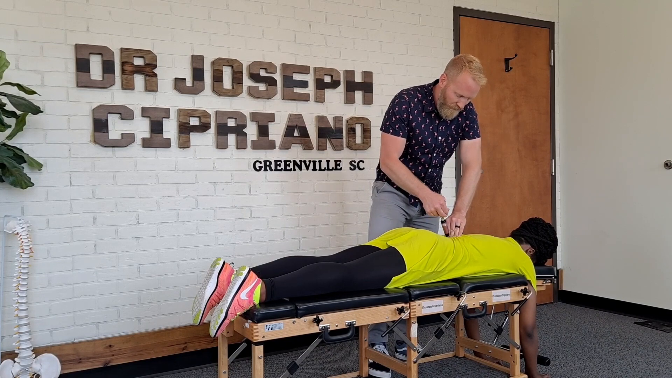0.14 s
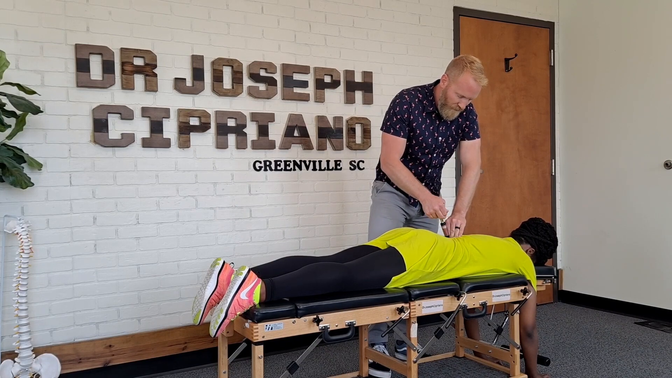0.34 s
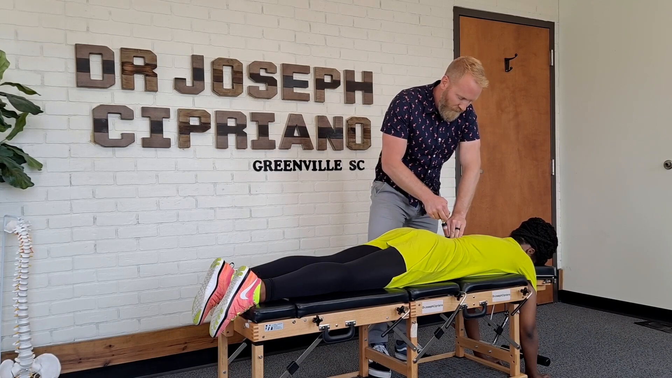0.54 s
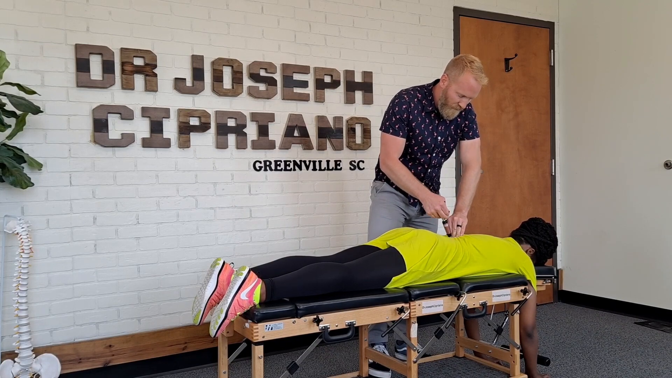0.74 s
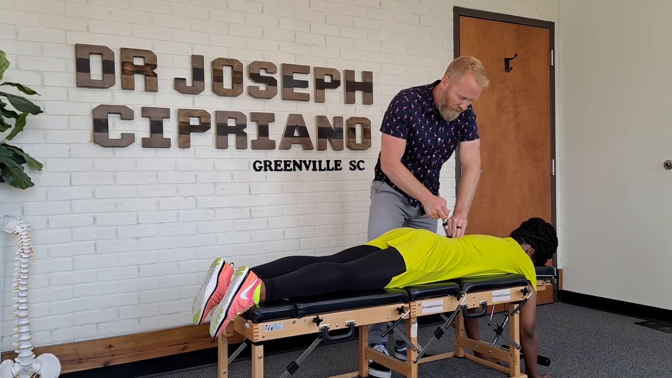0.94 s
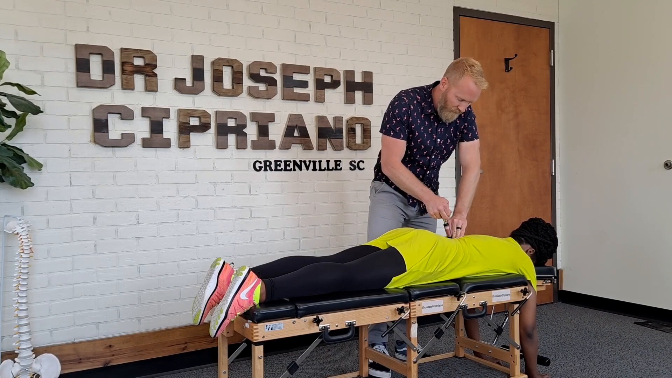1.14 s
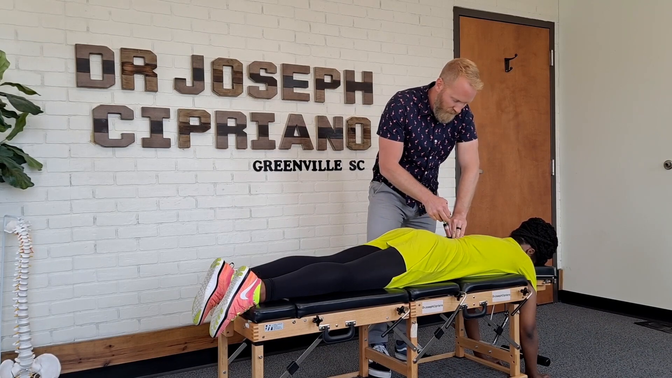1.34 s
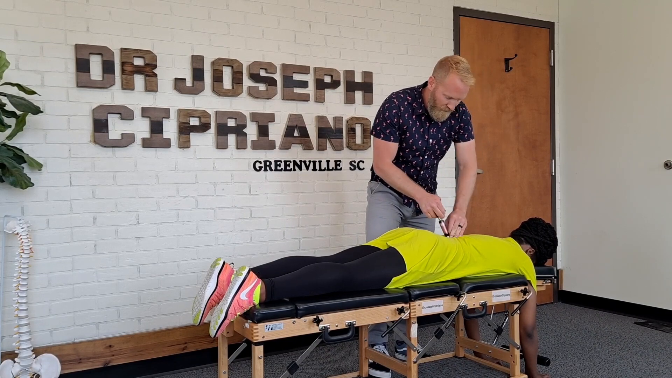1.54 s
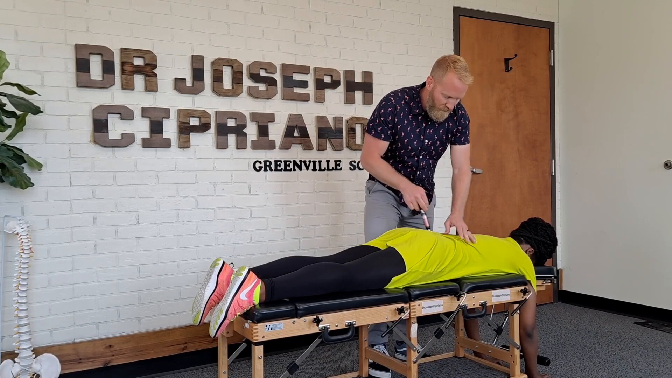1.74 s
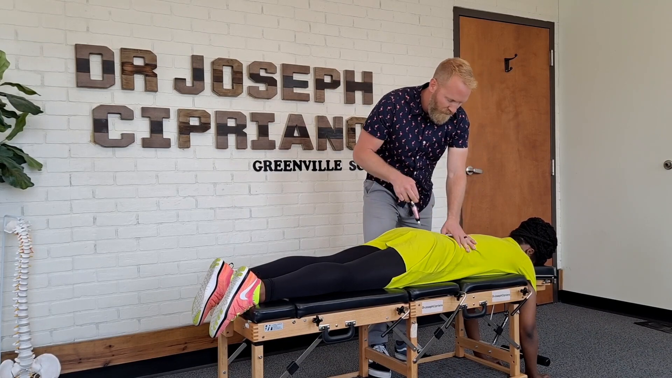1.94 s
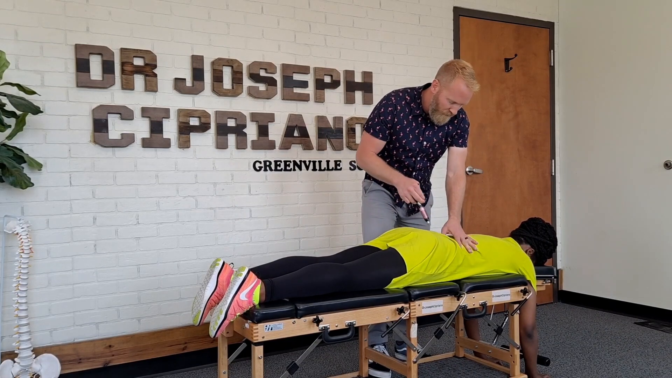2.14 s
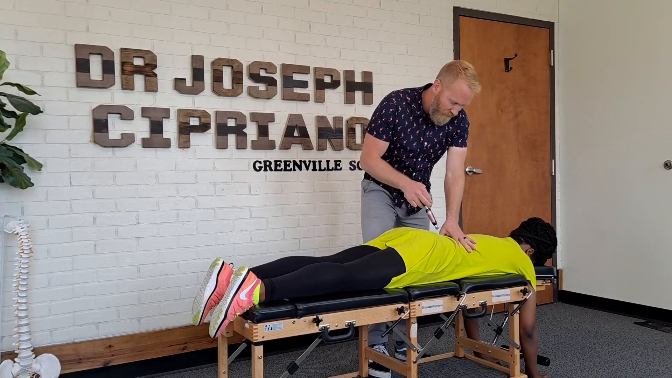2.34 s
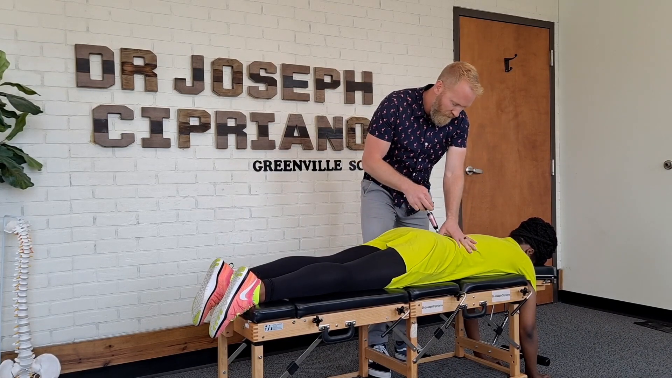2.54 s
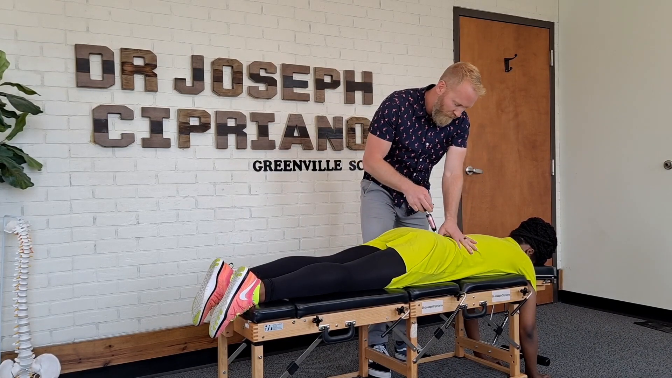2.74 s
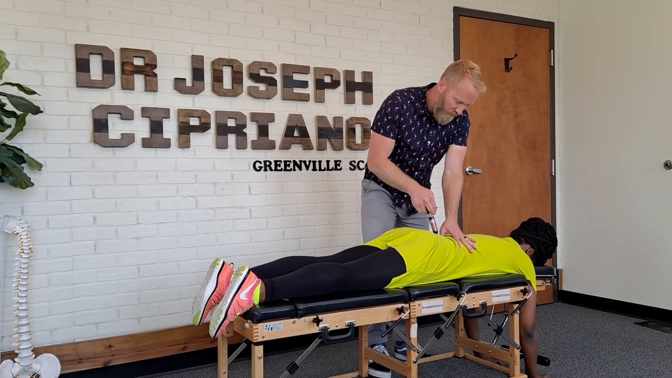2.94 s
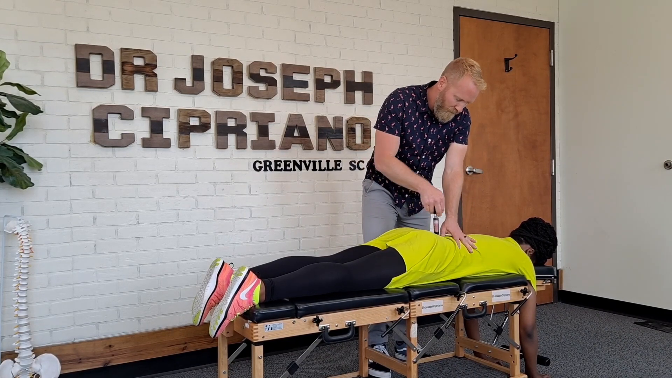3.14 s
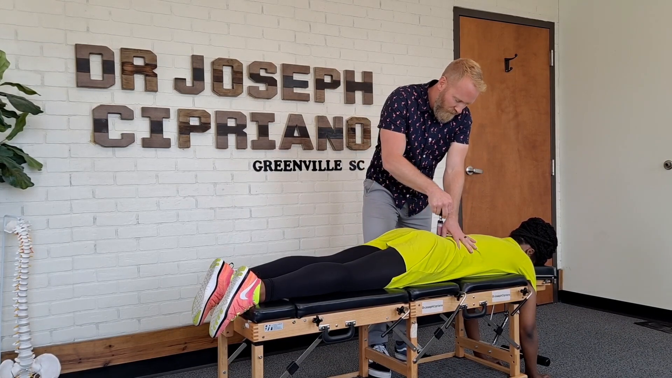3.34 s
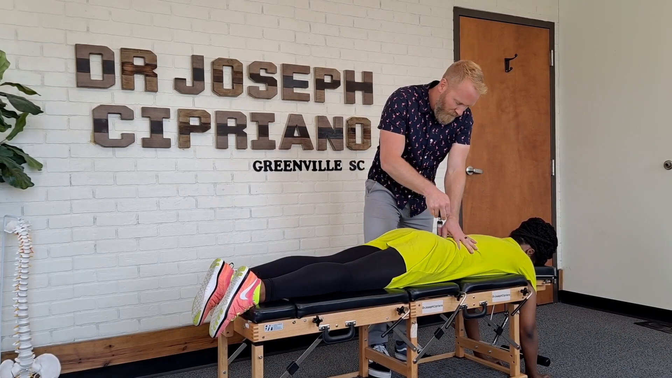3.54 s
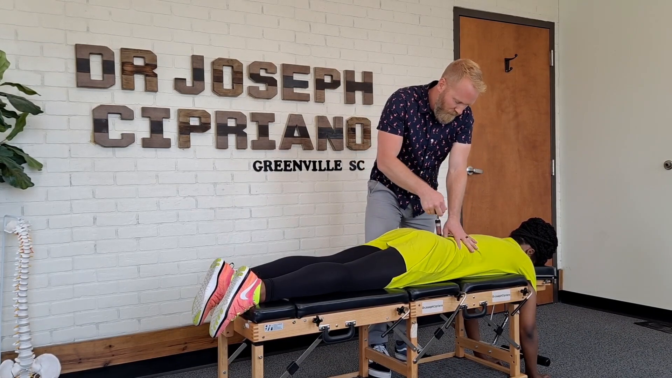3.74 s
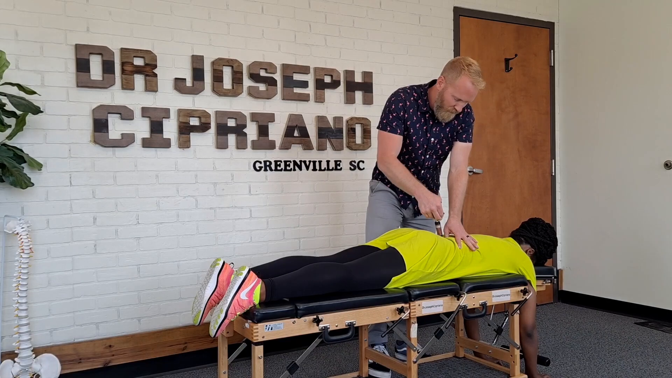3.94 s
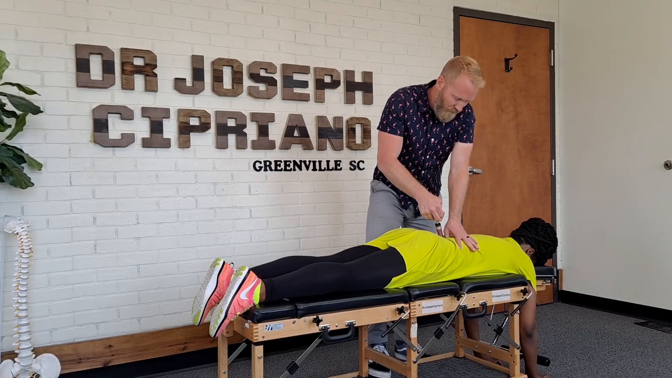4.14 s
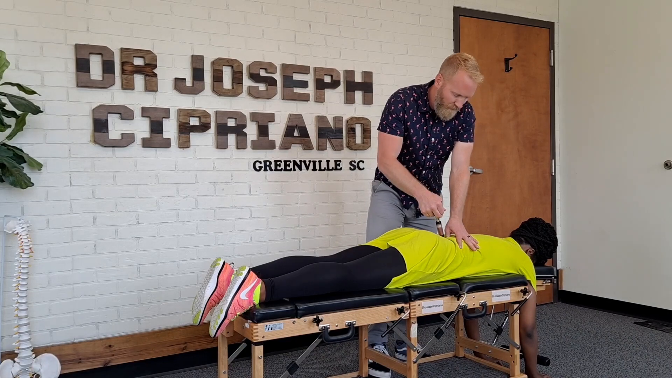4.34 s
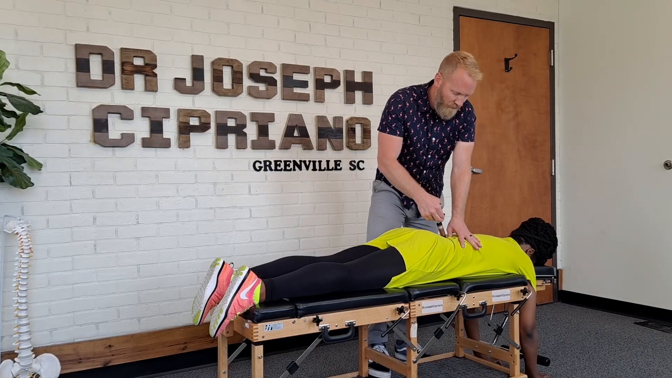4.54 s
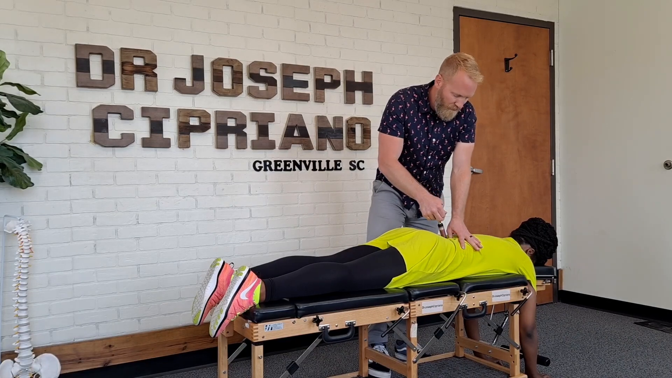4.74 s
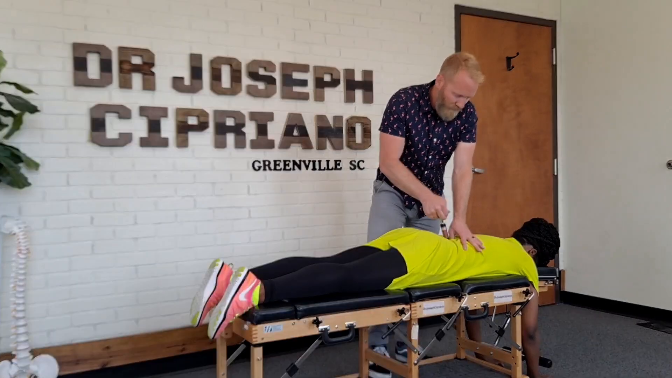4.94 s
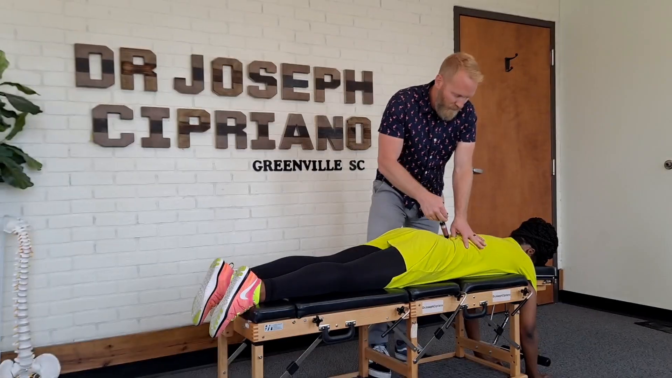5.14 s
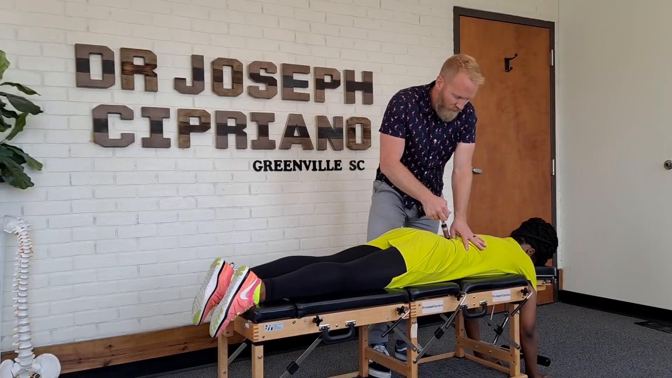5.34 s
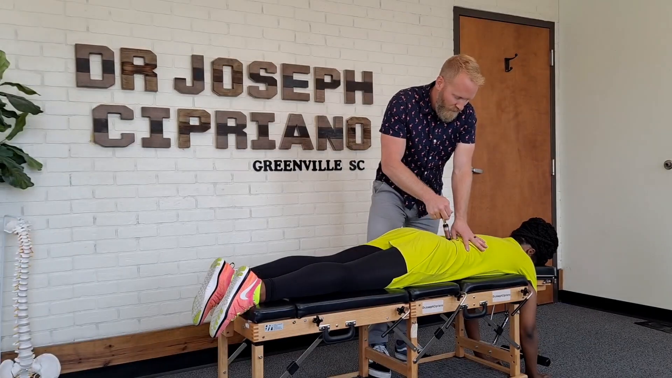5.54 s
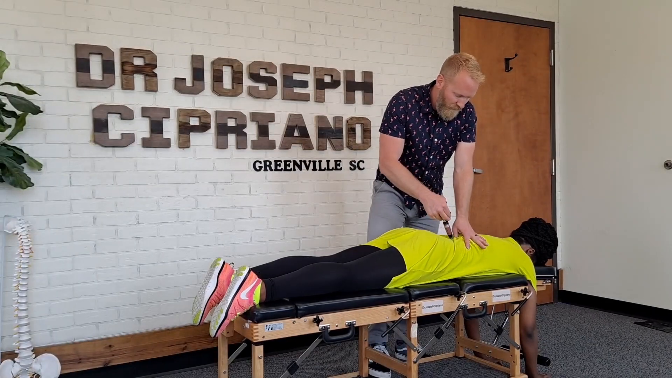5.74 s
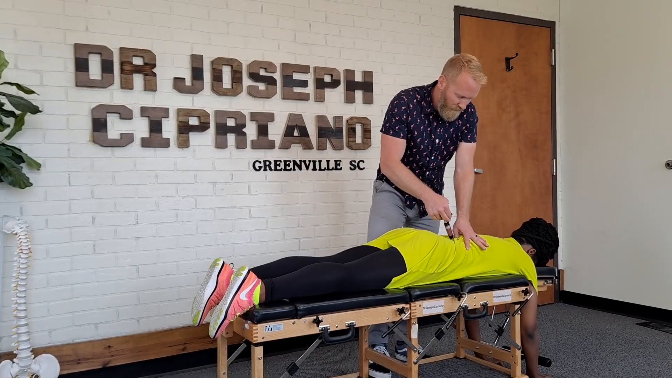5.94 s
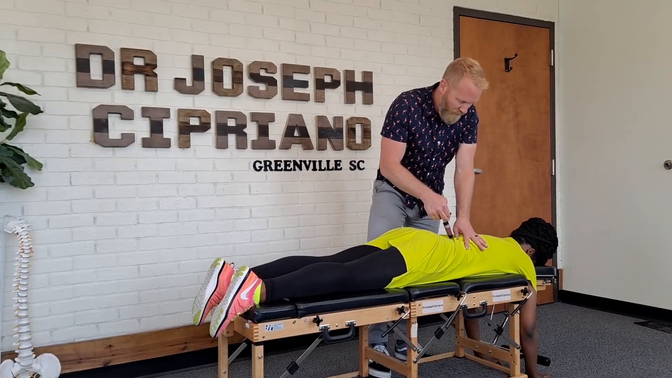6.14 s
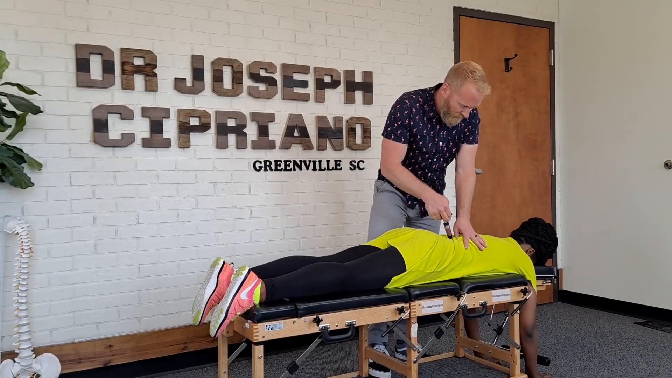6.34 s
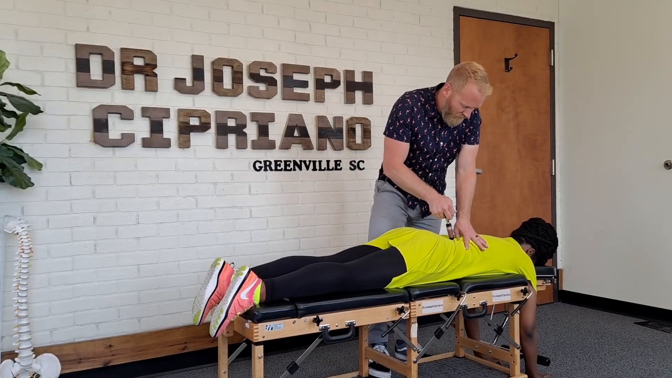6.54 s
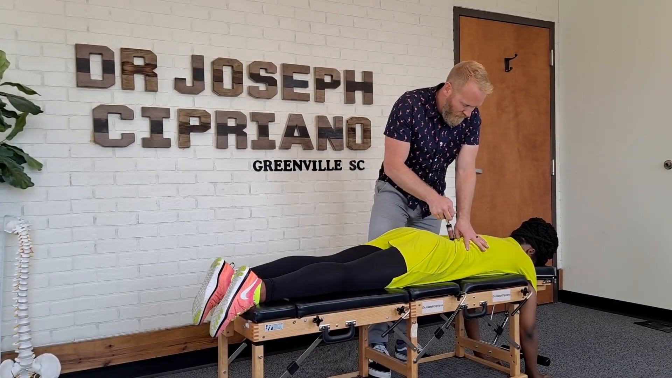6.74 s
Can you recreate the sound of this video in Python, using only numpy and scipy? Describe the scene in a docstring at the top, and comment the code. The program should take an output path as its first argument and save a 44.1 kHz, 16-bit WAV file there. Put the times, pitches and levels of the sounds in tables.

```python
"""First the fading room sound of a click, over a low steady ventilation hum; then thirteen more hard clicks, in short runs.
A spring-loaded adjusting tool is fired against a clothed back: a catch slips and a hammer hits its anvil.
Around the clicks come thin ticks of the catch, rattles of spring and handle, soft knocks and cloth rubs.
Each tool sound is shaped noise sent through a small hard-walled treatment room.
The ventilation is filtered noise plus wavering tones."""
import sys
import numpy as np
from scipy import signal
from scipy.fft import rfft, irfft
from scipy.io import wavfile

SR = 44100
rng = np.random.default_rng(int(sys.argv[2]) if len(sys.argv) > 2 else 0)


def put_to_file(sound):
    """Save the sound as 16-bit audio at rate SR, in the file named by the first command-line argument."""
    columns = np.atleast_2d(sound).T  # one column per channel
    safe = np.clip(columns, -1, 1)
    whole_steps = np.round(safe * 32767)
    wavfile.write(sys.argv[1], SR, whole_steps.astype(np.int16))


N = 299439

# Event levels below are relative: scene() adds one trim per kind of sound.
# ventilation rumble spectrum: pitch_hz, level_db
AIR_SPECTRUM = [(22, -42.5), (31, -29.5), (40, -13.5), (52, -3), (80, -0.5), (105, -8), (165, -11),
                (260, -16), (380, -26), (680, -35.5), (1200, -57.5), (2400, -55), (4000, -63.5),
                (14500, -64)]
# tones of the fan motor: pitch_hz, level_db
MOTOR_TONES = [(59.3, -43), (120, -49.5), (192, -57.5), (240, -53.5)]
# ventilation, left ear minus right ear: pitch_hz, difference_db
AIR_BALANCE_TABLE = [(40, 1), (60, -8.5), (130, -1), (380, -3), (700, -10.5), (2000, -0.5)]
# ventilation, how far the left ear leads: pitch_hz, phase_radians
AIR_LEAD = [(60, 0.84), (125, 0.97), (400, 0.24), (1000, 0.13)]
# early returns from walls, floor and ceiling: delay_s, left_db, right_db
EARLY_ECHOES = [(.0053, -12, -8), (.0067, -6, -14), (.0102, -11, 1.5), (.0131, -13, -1.5), (.0162, -8, -15),
                (.0215, -13, -8), (.033, -16, -13)]
# time for the room sound to fall by 60 dB: pitch_hz, t60_s
ROOM_DECAY = [(250, 0.7), (600, 0.35), (2100, 0.32), (5500, 0.35), (9000, 0.34), (14500, 0.25)]
# hand and tip press on the shirt: middle_s, length_s, level_db
CLOTH_RUBS = [(0.074, 0.038, -39.5), (1.942, 0.088, -64), (2.241, 0.14, -64), (3.598, 0.1, -51),
              (4.282, 0.089, -48.5), (4.907, 0.21, -40), (5.532, .2, -44), (6.697, 0.096, -43)]
# colour of the cloth rub: pitch_hz, level_db
RUB_SPECTRUM = [(50, -37.5), (200, -16.5), (420, -6), (590, 7.5), (750, -5.5), (930, 0.5), (1200, -11),
                (2400, -13.5), (5000, -28.5), (12000, -32)]
# barrel touches the grip softly: start_s, level_db
GRIP_KNOCKS = [(0.307, -45), (0.958, -39.5), (1.755, -54.5)]
# resonances of the barrel: pitch_hz, width_hz, level_db
BARREL_RINGS = [(586, 70, -6.5), (1980, 200, -3.5), (2100, 140, -1), (2200, 130, 1.5), (2310, 200, -9.5),
                (2640, 140, -7.5)]
# loose handle rattles as the grip shifts: start_s, level_db
GRIP_SHIFTS = [(0.955, -44), (1.596, -46), (2.706, -47.5), (3.25, -62), (3.32, -53.5), (3.376, -50.5)]
# handle is let go and springs back: start_s, level_db
HANDLE_RELEASES = [(0.301, -36), (0.891, -46.5), (1.6631, -37), (2.857, -45), (3.645, -38.5), (3.9692, -37),
                   (4.561, -34.5), (5.208, -33.5), (5.823, -34.5)]
# colour of every rattle: pitch_hz, level_db
RATTLE_SPECTRUM = [(50, -39), (300, -8), (1200, -6), (2500, 1), (4000, -1), (7500, -0.5), (10000, -5.5),
                   (15000, -8)]
# catch drops back in: start_s, level_db
CATCH_TICKS = [(0.0074, -26), (0.5807, -26.5), (1.1459, -32), (1.406, -26), (4.2524, -25), (4.8763, -26.5),
               (5.5068, -25.5), (6.739, -24.5)]
# colour of the catch: pitch_hz, level_db
CATCH_SPECTRUM = [(500, -23.5), (2000, -12), (6000, -15.5), (10000, -14), (11500, -7), (12900, 2),
                  (14000, -9.5), (15000, -16)]
# hammer blows: start_s, level_db, barrel_ring_db, back_thud_db
HAMMER_BLOWS = [(-0.14, -16, 2.5, -1), (0.0975, -14.5, -2, 1), (0.4279, -14, 0.5, -1.5),
                (0.6715, -14.5, 0, 4), (1.2503, -14, -1, 3.5), (3.473, -14, -0.5, -12.5),
                (3.7349, -15.5, 2.5, -5.5), (4.1172, -15.5, -3.5, -4), (4.3573, -14, 0.5, -2),
                (4.734, -13.5, -1, -4.5), (4.989, -13, 2, -1), (5.3743, -12.5, -3.5, -1.5),
                (5.615, -12.5, 2.5, 2), (6.5746, -11, -0.5, -1.5)]
# colour of hammer on anvil: pitch_hz, level_db
CRACK_SPECTRUM = [(40, -39), (160, -12), (400, -14), (600, -2), (950, -8), (1500, -8), (3200, -2.5),
                  (5000, -1), (6300, -2), (7600, 2), (9000, -0.5), (11000, -1.5), (12800, 2.5), (14700, 5)]

AIR_DB = -39.5
TOP_HZ = 14650  # upper limit of the recorder
# a harder blow is brighter: brightness at the usual level, and dB of brightness per dB of level
USUAL_DB, USUAL_BRIGHT_DB, BRIGHT_PER_DB = -12.5, -2.5, 0.77
# rattle decay settings are half the time taken to fall by 60 dB
SQUEEZE_LEAD_S, SQUEEZE_DB, SQUEEZE_HALF_T60_S, SQUEEZE_BRIGHT_DB = 0.076, -41, 0.078, -4
RELEASE_HALF_T60_S, RELEASE_BRIGHT_DB = 0.032, 4
SHIFT_HALF_T60_S, SHIFT_BRIGHT_DB = 0.08, -4

SIZE, LEAD = 8192, 256  # samples in one event, and samples before contact
T = (np.arange(SIZE) - LEAD) / SR  # seconds within one event, 0 at contact
HZ = np.arange(SIZE // 2 + 1) * SR / SIZE  # frequencies in one event's spectrum
LEFT_RIGHT = np.array([[1], [-1]])


def undb(db):
    """Decibels to gain."""
    return 10 ** (np.asarray(db) / 20)


def read(table, hz):
    """Read a (pitch_hz, value) table along straight lines on a log-frequency axis."""
    f, value = np.transpose(table)
    return np.interp(np.log(np.maximum(hz, 1)), np.log(np.maximum(f, 1)), value)


def bins(size):
    """Frequencies in the spectrum of so many samples."""
    return np.arange(size // 2 + 1) * SR / size


def unit(x):
    """Scale to unit energy."""
    return x / np.sqrt(np.sum(x ** 2))


def colour(x, db):
    """Filter with the given gain at each frequency, without sounding before the attack."""
    size = len(x)
    # folding the cepstrum forward in time makes the filter causal
    cepstrum = irfft(np.log(undb(db)), size)
    cepstrum[1:size // 2] *= 2
    cepstrum[size // 2 + 1:] = 0
    return irfft(rfft(x) * np.exp(rfft(cepstrum)), size)


def tilt(db):
    """Tilt the treble about 4 kHz by so many dB per two octaves; flat below 1 kHz."""
    return db * np.log2(np.maximum(HZ, 1000) / 4000) / 2


def fade(t, t60):
    """Exponential decay from t = 0, falling 60 dB in t60 seconds."""
    return (t >= 0) * np.exp(-np.log(1000) * np.maximum(t, 0) / t60)


def snap(envelope):
    """A contact force: noise with its spectrum evened out, then silenced outside its envelope."""
    force = rfft(envelope * rng.standard_normal(SIZE))
    flat = irfft(force / (np.abs(force) + 1e-12), SIZE)
    return flat * np.minimum(1, 20 * envelope)


def add(out, s, x):
    """Mix a stereo sound in at a time."""
    start = int(round(s * SR))
    a, b = max(start, 0), min(start + x.shape[1], N)
    out[:, a:b] += x[:, a - start:b - start]


def stereo_noise(mid, side, alike):
    """Blend two noise spectra so that the ears agree where alike is near 1."""
    return mid * np.sqrt(1 + alike) + LEFT_RIGHT * side * np.sqrt(1 - alike)


def ventilation(duct_hz=59, duct_width_hz=7, duct_db=3, apart_hz=520, hum_pan_db=-4, waver=0.56):
    """Duct rumble is noise with one boomy resonance; the fan motor adds tones that waver."""
    hz, t = bins(N), np.arange(N) / SR
    boom_db = duct_db / (1 + ((hz - duct_hz) / duct_width_hz) ** 2)
    gain = undb(read(AIR_SPECTRUM, hz) + boom_db)
    mid, side = rfft(rng.standard_normal((2, N))) * gain
    ears = stereo_noise(mid, side, 1 / (1 + (hz / apart_hz) ** 2))
    balance = undb(LEFT_RIGHT * read(AIR_BALANCE_TABLE, hz) / 2)
    phase = np.exp(.5j * LEFT_RIGHT * read(AIR_LEAD, hz))
    air = irfft(ears * balance * phase, N)
    air *= undb(AIR_DB) / np.std(air.mean(0))
    for tone_hz, db in MOTOR_TONES:
        # slow noise makes both loudness and phase wander
        drift = irfft(rfft(rng.standard_normal((2, N))) * np.exp(-hz / 2), N)
        swell, lag = waver * drift / drift.std()
        angle = 2 * np.pi * tone_hz * t + 2 * lag + LEFT_RIGHT * read(AIR_LEAD, tone_hz) / 2
        peak = np.sqrt(2) * undb(db + LEFT_RIGHT * hum_pan_db / 2)
        air += peak * (1 + swell) * np.sin(angle)
    return air


def diffuse(size=16384, alike_hz=600):
    """Dense late reflections: each band of noise decays at its own rate, the bass alike in both ears."""
    t, hz = np.arange(size) / SR, bins(size)
    mid, side = rfft(rng.standard_normal((2, size)))
    ears = stereo_noise(mid, side, 1 / (1 + (hz / alike_hz) ** 2)) / np.sqrt(2)
    centres, t60s = np.transpose(ROOM_DECAY)
    tail = np.zeros((2, size))
    for t60, share in zip(t60s, np.eye(len(centres))):
        band = irfft(ears * read(np.c_[centres, share], hz), size)
        tail += band * fade(t, t60)
    return tail


def room(x, tails, tail_db=-23, left_db=-1.35, direct_db=-1.0, direct_left_db=-7,
         ear_lag_s=.0002, build_s=0.0028, gloss_hz=3500, dull_hz=10000):
    """Direct sound, a few hard returns and a dense tail, in a slightly different pattern each time."""
    t = np.arange(tails.shape[2]) / SR
    mix = unit(rng.standard_normal(len(tails)))
    tail = np.tensordot(mix, tails, 1) * (1 - np.exp(-t / build_s))
    early = np.zeros_like(tail)
    early[0, int(ear_lag_s * SR)] = undb(direct_db + direct_left_db)
    early[1, 0] = undb(direct_db)
    for delay_s, *ear_db in EARLY_ECHOES:
        place = int((delay_s + .0001 * rng.standard_normal()) * SR)
        early[:, place] += undb(ear_db + rng.standard_normal(2))
    # the tool beams its treble: the first arrivals are thin, the tail is duller
    early = signal.lfilter(*signal.butter(1, gloss_hz, "high", fs=SR), early)
    tail = signal.lfilter(*signal.butter(1, dull_hz, fs=SR), tail)
    response = early + tail * undb([[tail_db + left_db], [tail_db]])
    return signal.fftconvolve(x[None], response, axes=1)


def rub(length_s):
    """Soft friction on cloth: dull noise that swells and lets go."""
    size = int(length_s * SR)
    x = np.pad(rng.standard_normal(size) * np.hanning(size), (0, SIZE))
    return unit(colour(x, read(RUB_SPECTRUM, bins(len(x))))) * np.sqrt(size)


def barrel(detune=0.011, scatter_db=2.5):
    """Power gain of the barrel's hand-damped resonances, a little different at each use."""
    chance = rng.standard_normal((len(BARREL_RINGS), 2))
    power = 0
    for (hz, width_hz, db), (louder, sharper) in zip(BARREL_RINGS, chance):
        offset = HZ - hz * (1 + detune * sharper)
        power = power + undb(db + scatter_db * louder) ** 2 / (1 + (2 * offset / width_hz) ** 2)
    return power


def knock(contact_t60=0.031, thin_hz=3500):
    """A padded touch that favours the barrel's upper resonances."""
    power = barrel() / (1 + (thin_hz / (HZ + 1)) ** 4)
    return unit(colour(snap(fade(T, contact_t60)), 10 * np.log10(power)))


def rattle(half_t60_s, bright_db, grain_db=5, size=64):
    """A short, fading cluster of uneven small contacts, each grain of equal length."""
    grains = undb(grain_db * np.repeat(rng.exponential(size=SIZE // size), size))
    force = snap(grains * fade(T, 2 * half_t60_s))
    return unit(colour(force, read(RATTLE_SPECTRUM, HZ) + tilt(bright_db)))


def latch(contact_t60=0.0025, first_db=5, repeat_s=0.0102, scrape_db=-19, scrape_t60=0.15):
    """A tiny steel catch ticks: a hard first contact, a weaker repeat like a wall echo, a faint fading scrape."""
    first = undb(first_db) * fade(T, contact_t60)
    repeat = fade(T - repeat_s, contact_t60)
    scrape = undb(scrape_db) * fade(T, scrape_t60)
    return unit(colour(snap(first + repeat + scrape), read(CATCH_SPECTRUM, HZ)))


def blow(ring_db, bright_db, thud_db, slip_s=.003, slip_db=-14, contact_t60=.0055,
         chatter_db=-23, chatter_t60=0.088, barrel_db=7, back_hz=230, back_width_hz=90):
    """The catch slips, the hammer cracks on the anvil, the spring chatters, barrel and back answer."""
    slip = undb(slip_db) * ((T > -slip_s) & (T < 0))  # while the hammer flies
    chatter = undb(chatter_db) * fade(T, chatter_t60)
    force = snap(slip + fade(T, contact_t60) + chatter)
    crack = undb(read(CRACK_SPECTRUM, HZ) + tilt(bright_db))
    thud = undb(thud_db) / (1 + ((HZ - back_hz) / back_width_hz) ** 2)
    ring_power = undb(barrel_db + ring_db) ** 2 * barrel()
    return unit(colour(force, 10 * np.log10(crack ** 2 + thud ** 2 + ring_power)))


def scene(blow_db=20, latch_db=16, rattle_db=17, knock_db=15, rub_db=-7.5):
    """Lay the tool sounds over the ventilation, all in one room; a spring scrape leads each blow."""
    out = ventilation()
    tails = np.array([diffuse() for _ in range(6)])

    def play(s, sound, db):
        """Sound one event in the room, with its contact at s."""
        add(out, s + T[0], room(sound, tails) * undb(db))

    for middle_s, length_s, db in CLOTH_RUBS:
        add(out, middle_s - length_s / 2, room(rub(length_s), tails) * undb(db + rub_db))
    for s, db in GRIP_KNOCKS:
        play(s, knock(), db + knock_db)
    for s, db in GRIP_SHIFTS:
        play(s, rattle(SHIFT_HALF_T60_S, SHIFT_BRIGHT_DB), db + rattle_db)
    for s, db in HANDLE_RELEASES:
        play(s, rattle(RELEASE_HALF_T60_S, RELEASE_BRIGHT_DB), db + rattle_db)
    for s, db in CATCH_TICKS:
        play(s, latch(), db + latch_db)
    for s, db, ring_db, thud_db in HAMMER_BLOWS:
        squeeze = rattle(SQUEEZE_HALF_T60_S, SQUEEZE_BRIGHT_DB)
        play(s - SQUEEZE_LEAD_S, squeeze, SQUEEZE_DB + rattle_db)
        bright_db = USUAL_BRIGHT_DB + BRIGHT_PER_DB * (db - USUAL_DB)
        play(s, blow(ring_db, bright_db, thud_db), db + blow_db)
    return out


def record(dry):
    """The recorder cuts the top with a steep low-pass filter."""
    return signal.sosfilt(signal.ellip(12, .2, 80, TOP_HZ, fs=SR, output="sos"), dry)


dry = scene()
out = record(dry)
put_to_file(out)
```